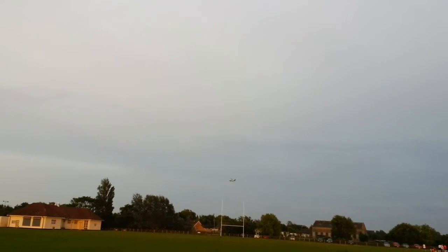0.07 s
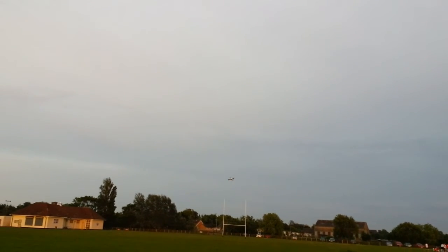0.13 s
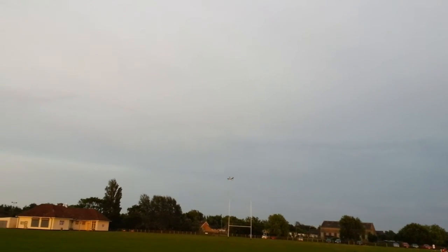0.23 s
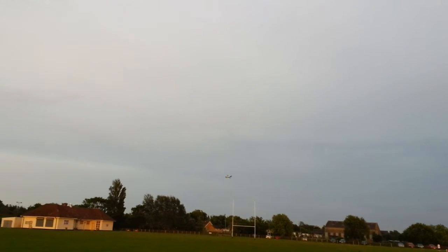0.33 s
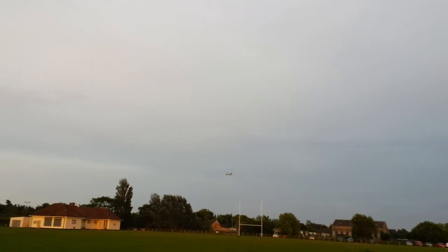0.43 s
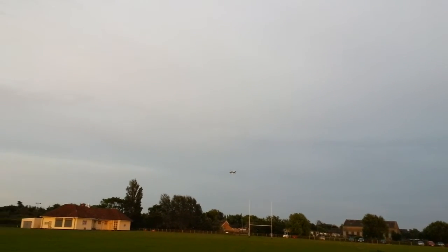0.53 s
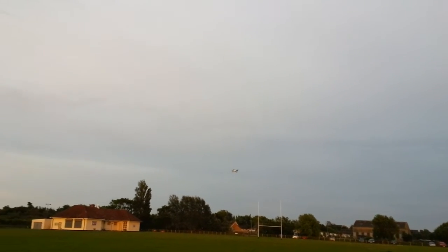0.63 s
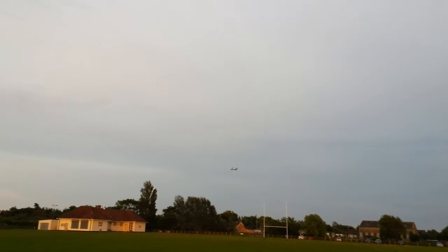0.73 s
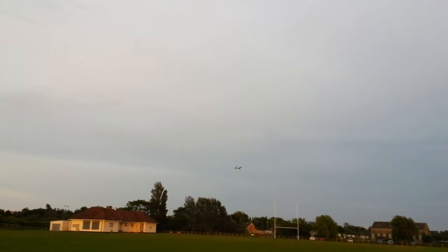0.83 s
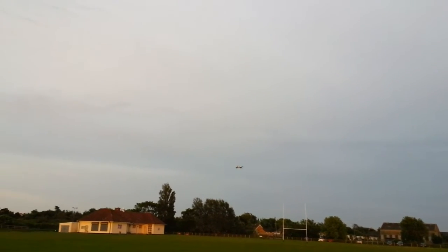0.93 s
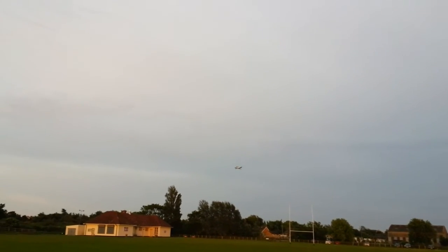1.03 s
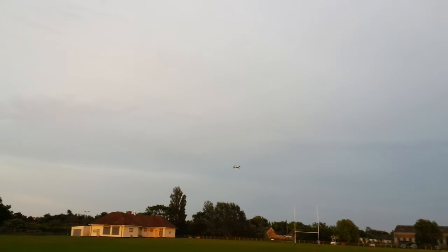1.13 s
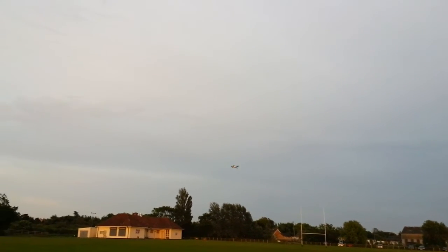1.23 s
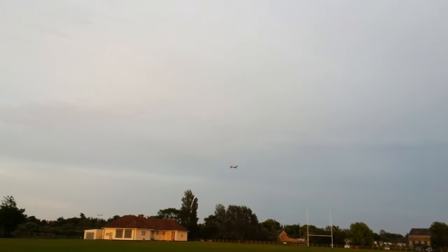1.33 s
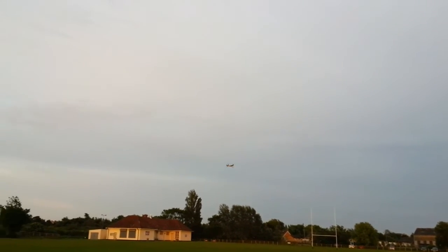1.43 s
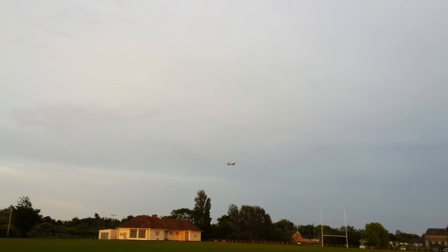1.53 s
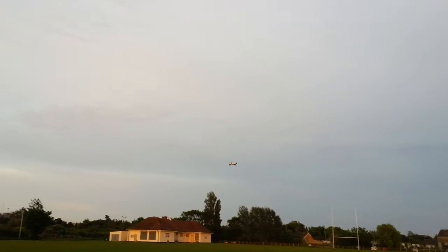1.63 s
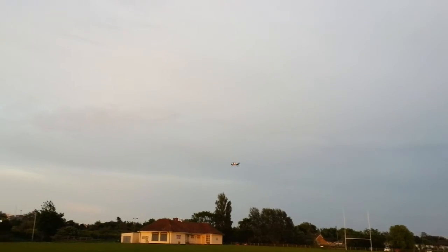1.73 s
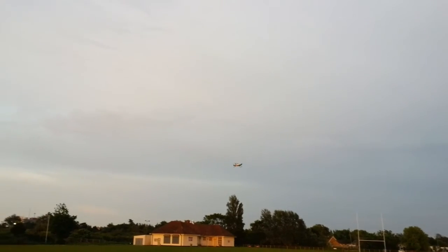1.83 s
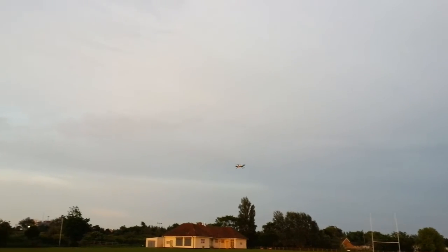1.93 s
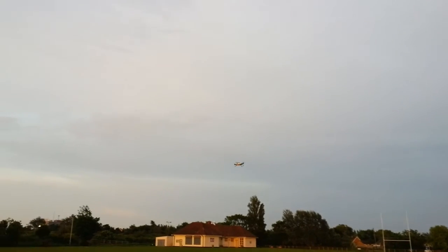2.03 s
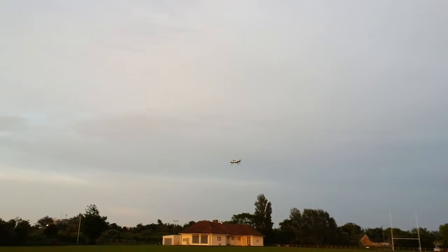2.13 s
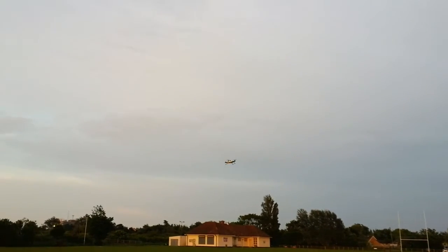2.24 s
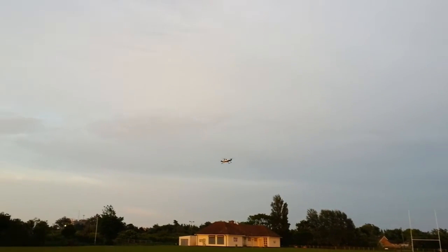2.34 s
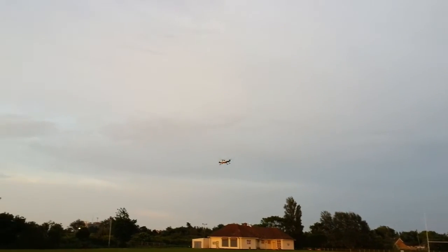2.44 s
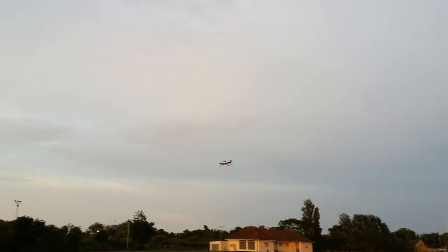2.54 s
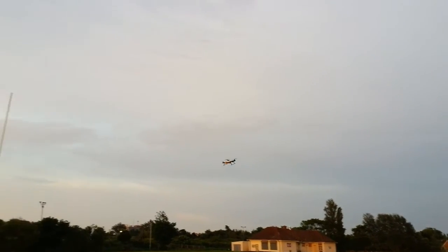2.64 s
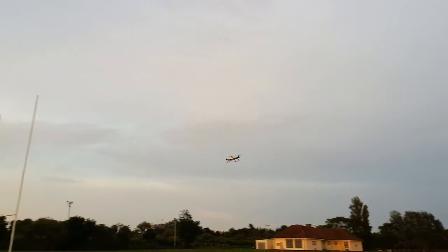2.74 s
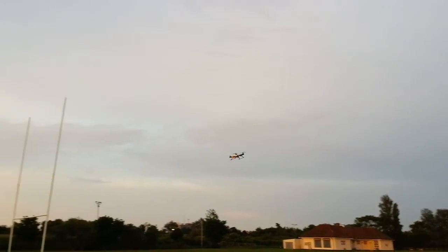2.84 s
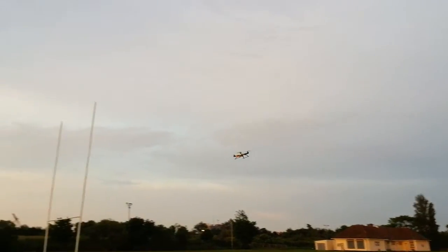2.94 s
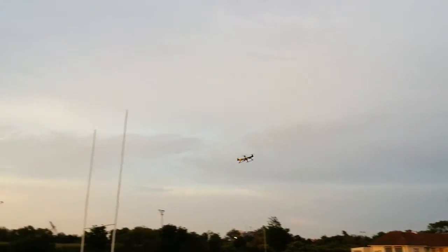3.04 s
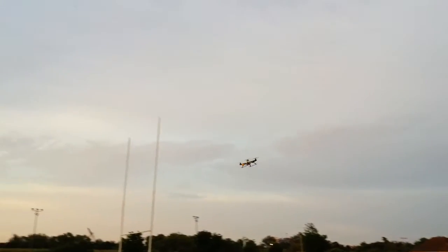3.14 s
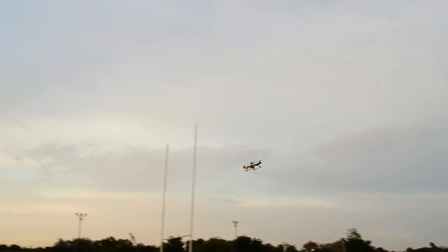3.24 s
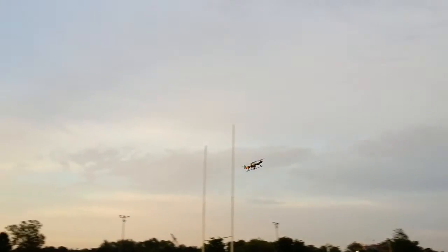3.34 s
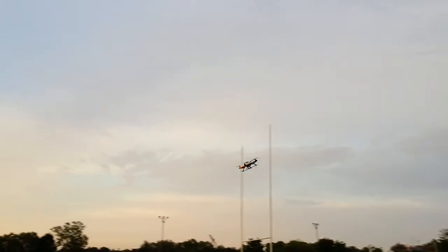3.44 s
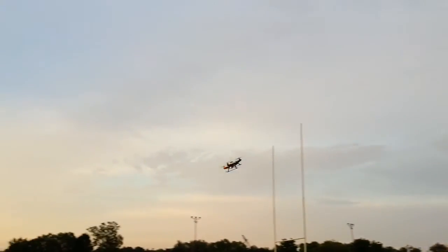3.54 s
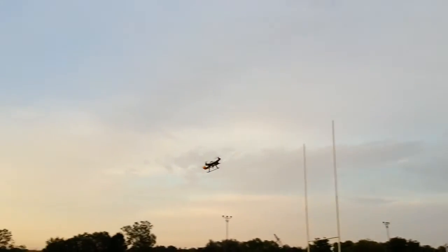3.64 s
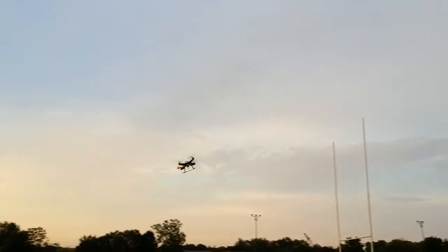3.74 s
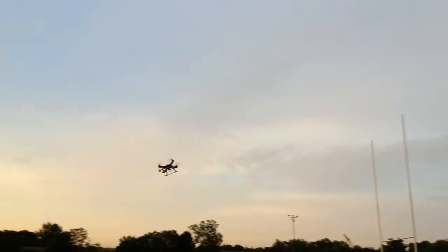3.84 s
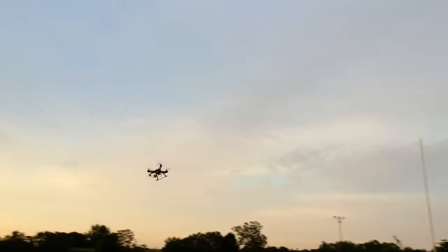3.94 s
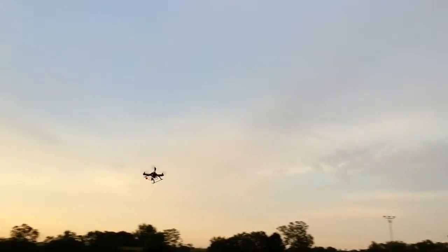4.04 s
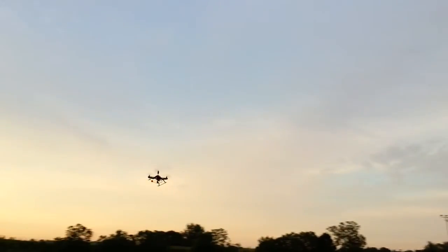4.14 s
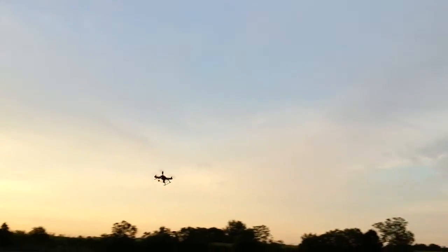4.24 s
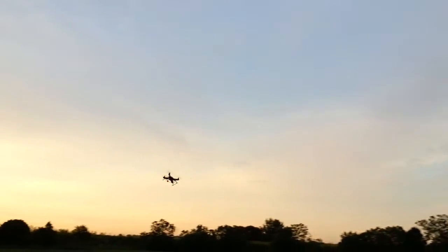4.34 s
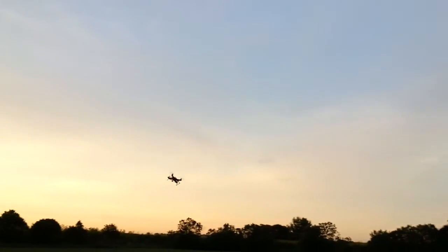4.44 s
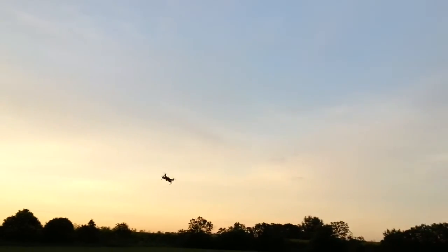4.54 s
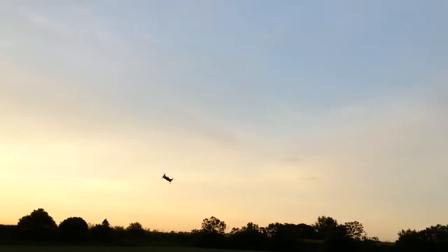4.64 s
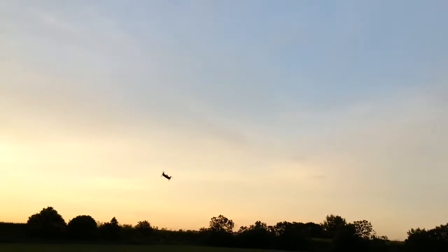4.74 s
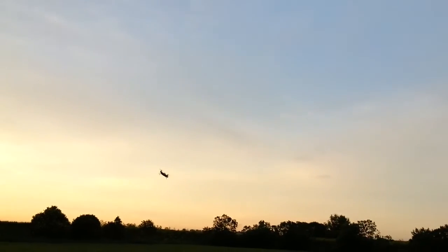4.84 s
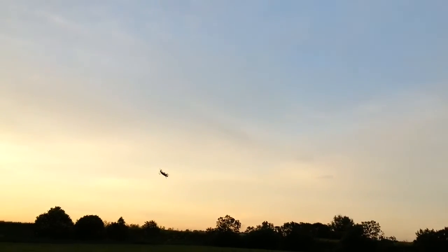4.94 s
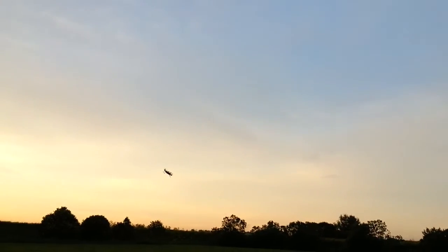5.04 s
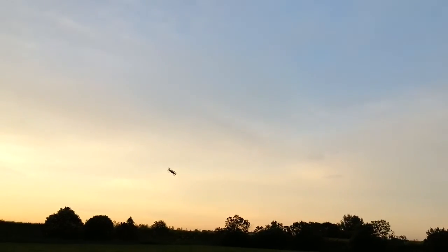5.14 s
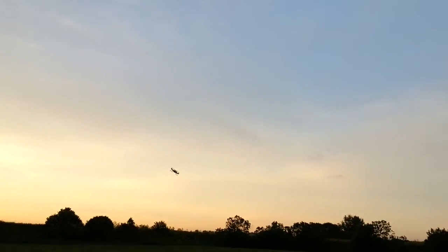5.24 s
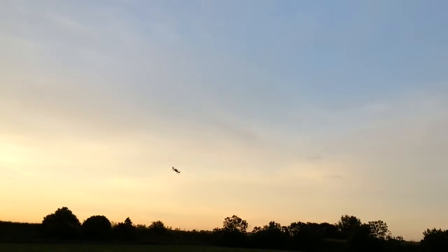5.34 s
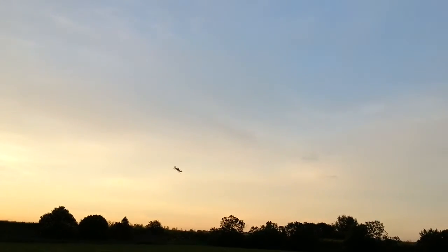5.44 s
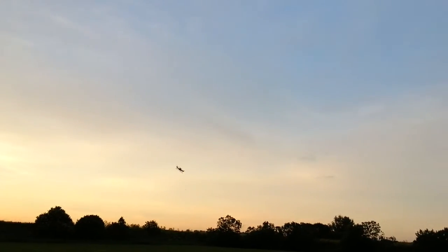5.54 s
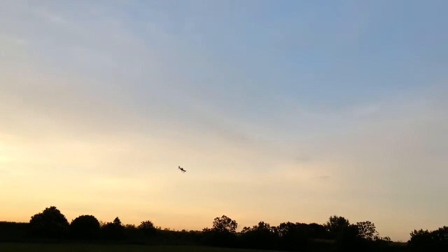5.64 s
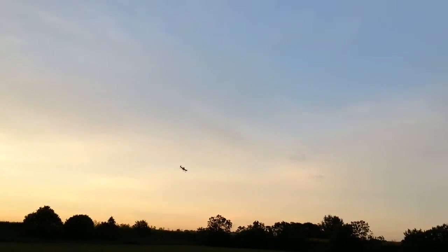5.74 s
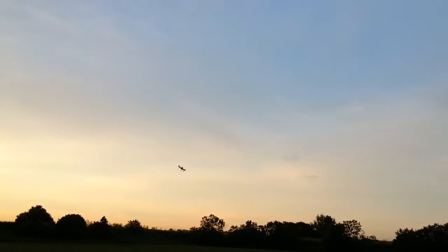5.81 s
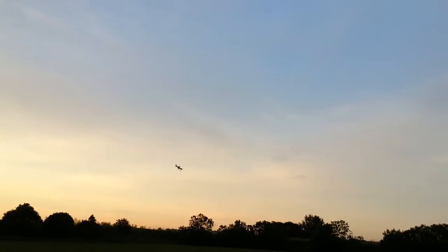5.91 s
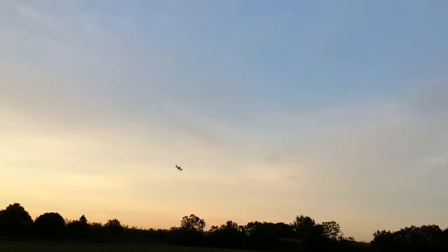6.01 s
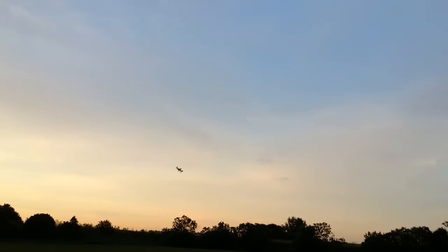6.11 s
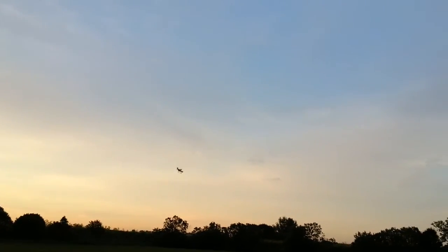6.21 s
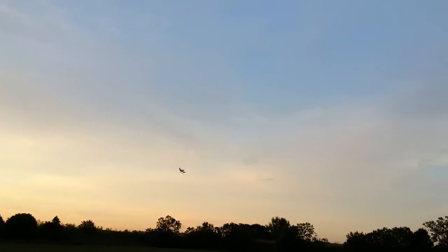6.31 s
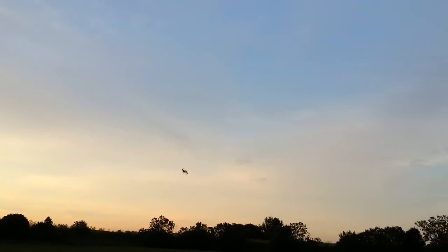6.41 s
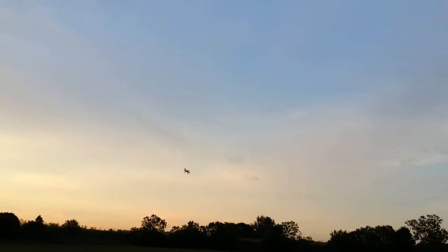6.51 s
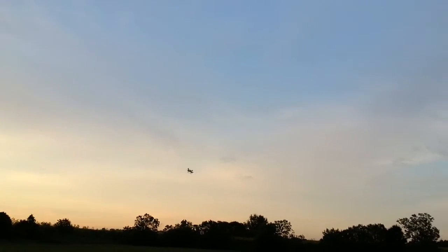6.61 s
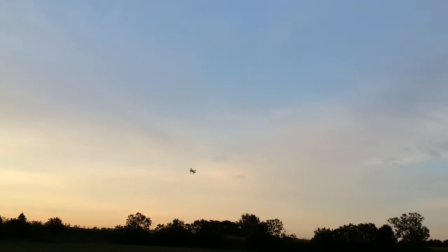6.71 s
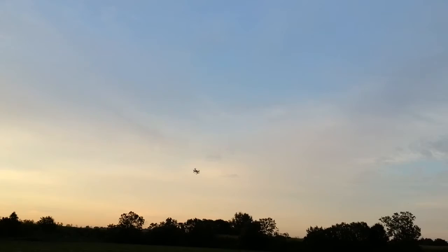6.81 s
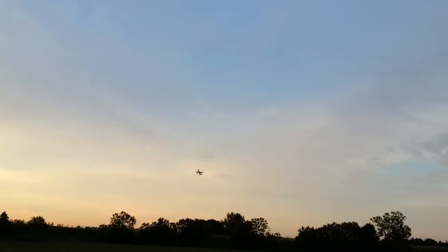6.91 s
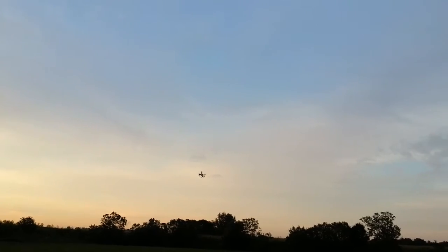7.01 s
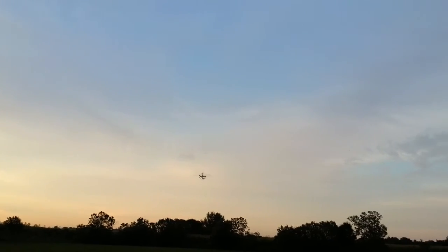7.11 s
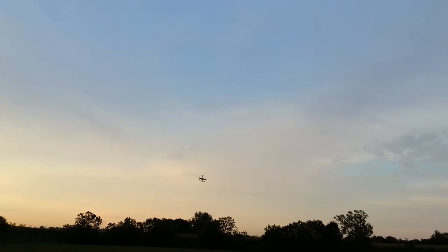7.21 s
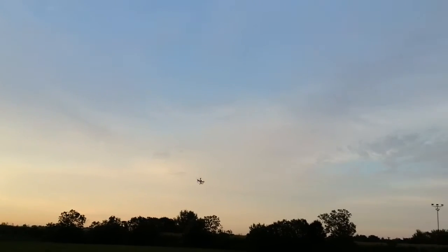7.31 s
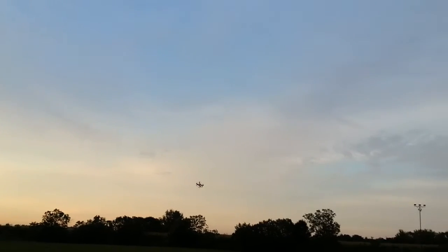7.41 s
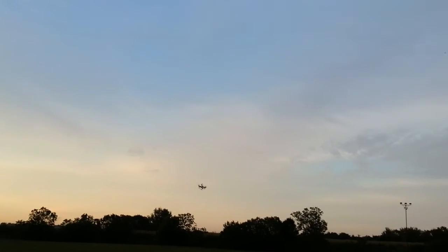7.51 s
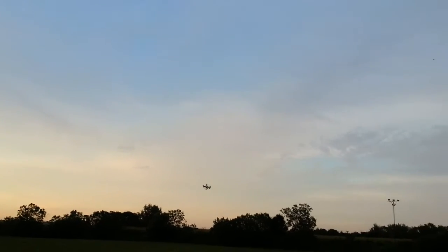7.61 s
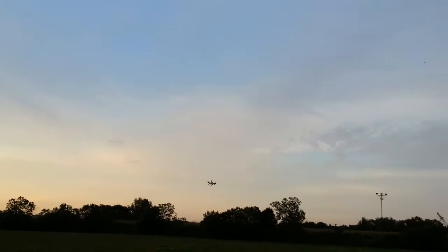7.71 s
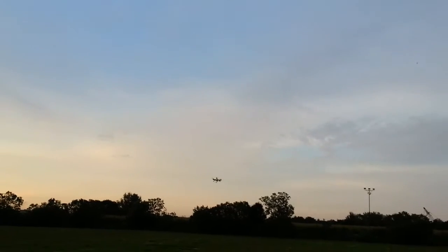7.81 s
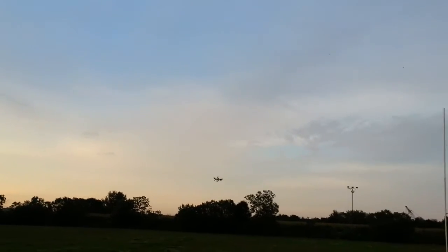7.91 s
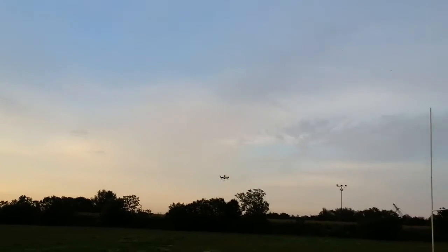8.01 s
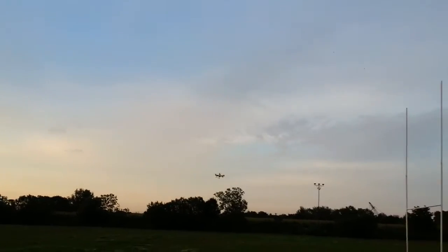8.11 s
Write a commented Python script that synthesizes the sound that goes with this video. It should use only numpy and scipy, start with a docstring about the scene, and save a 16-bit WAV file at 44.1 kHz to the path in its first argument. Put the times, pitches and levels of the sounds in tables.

```python
"""Drone fly-past over grass

A small multi-rotor drone comes close over a grass field, flies off and turns back.
Its motors whine at their magnet rates; speed controllers whistle and mix with the whine.
The blades hiss directly and off the grass, with low hums; all reaches a pair of microphone ports that
turn to follow it. A distant road roars off to one side and a faint breeze rumbles on the ports."""
import sys
import numpy as np
from scipy import signal
from scipy.fft import rfft, irfft
from scipy.io import wavfile
from scipy.ndimage import uniform_filter1d, map_coordinates

SR = 44100
rng = np.random.default_rng(int(sys.argv[2]) if len(sys.argv) > 2 else 0)


def master(y):
    """Save y as 16-bit WAV."""
    cut = np.clip(np.atleast_2d(y).T, -1, 1)
    pcm = np.round(cut * 32767)  # scale
    wavfile.write(sys.argv[1], SR, pcm.astype(np.int16))


N = 359856

# course of the drone: [t/s, approach speed/(m/s), controller whistle level at 1 m/dB]
COURSE = [(0.0, 5.5, -40), (0.15, 5.0, -37), (1, 5.8, -33), (1.35, 6.1, -32), (1.6, 6.3, -36),
          (2.2, 6.8, -39), (2.55, 6.24, -39), (2.76, 5.9, -34), (2.93, 5.5, -30), (3.05, 5.2, -38),
          (3.28, 2.8, -40), (3.45, 0.76, -34), (3.72, -2.24, -43), (3.85, -3.9, -43), (3.96, -5.1, -36),
          (4.1, -5.9, -32), (4.37, -6.6, -30), (4.5, -6.5, -37), (4.69, -6.4, -37), (5.15, -4.9, -36),
          (5.4, -4.8, -34), (5.95, -1.7, -36), (6.5, 0.5, -31), (7.13, 4.2, -36), (7.37, 5.5, -36),
          (7.7, 5.8, -39), (7.82, 5.9, -46), (7.98, 5.9, -37), (8.11, 5.9, -39)]
# resonances of the two microphone ports: [f/Hz, left gain/dB, right gain/dB]
PORT_COLOUR = [(1520, 0.5, 1), (2240, 1, -0.5), (2610, 2.5, 0), (3200, 10, 10), (3750, 9.5, 10),
               (4030, 3.5, -6), (4730, 4, 6.5), (5330, 2.5, -0.5), (5600, -2, -3), (5950, -4.5, -11.5),
               (6440, -2.5, -2.5), (6640, 3.5, 1.5), (7600, 1, -1), (8100, 6, -3), (8750, 2.5, -7),
               (9400, -1, 2), (10410, 0, -4.5), (10840, -4.5, -16.5), (11920, -2, 0), (14100, 3.5, -1),
               (14600, -10.5, -5.5)]


def undb(db):
    """Amplitude factor of a level in dB."""
    return 10 ** (np.asarray(db) / 20)


def unit(x):
    """Scale to an RMS of 1."""
    return x / np.sqrt(np.mean(x ** 2))


def curves(table):
    """Columns of a table, joined by straight lines in time."""
    s, *columns = np.transpose(table)
    t = np.arange(N) / SR
    return [np.interp(t, s, column) for column in columns]


def colour(x, hz, db):
    """Causal filter through (Hz, dB) points, from the cepstrum of the log gain."""
    f = np.fft.rfftfreq(4096, 1 / SR)
    gain_db = np.interp(np.log(f + 1), np.log(hz), db)
    cepstrum = irfft(np.log(undb(gain_db)))
    # folding the cepstrum forward in time gives minimum phase
    cepstrum[1:2048] *= 2
    cepstrum[2049:] = 0
    impulse = irfft(np.exp(rfft(cepstrum)))
    return signal.fftconvolve(x, impulse)[:N]


def delay(x, seconds):
    """Read x at a moving lag; a negative lag reads ahead."""
    return map_coordinates(x, [np.arange(N) - seconds * SR], order=3, mode="reflect")


def walk(rate):
    """Random levels held for 1 / rate s and smoothed twice; spread near 1."""
    k = int(SR / rate)
    steps = np.repeat(rng.standard_normal(N // k + 1), k)
    return 1.193 * uniform_filter1d(uniform_filter1d(steps, k), k)[:N]


def turns(hz):
    """Running phase in radians of a moving frequency, from a random start."""
    return 2 * np.pi * (np.cumsum(hz) / SR + rng.random())


def swell(start, end, edge):
    """1 between start and end, 0 outside, with straight ramps of edge s centred on both."""
    t = np.arange(N) / SR
    return np.clip(np.minimum(t - start, end - t) / edge + .5, 0, 1)


def breeze():
    """Faint, unsteady low rumble on each port."""
    waver_db = np.minimum(4.9 * walk(7) + 7.2 * walk(14), 4.0)  # level wavers at random, rises capped
    shared = rng.standard_normal(N)
    ports = []
    for _ in range(2):
        noise = 0.52 * shared + rng.standard_normal(N)
        rumble = colour(noise, [20, 50, 120, 220, 400], [-6, -13.5, -11.5, -5.5, -22.0])
        ports.append(undb(-70.5 + waver_db + 2.8 * walk(9)) * unit(rumble))
    return np.array(ports)


def road():
    """Tyre roar: noise from one bearing, set by the lag between the ports, with a diffuse share."""
    # spectrum of the roar: [f/Hz, relative density/dB]
    roar_shape = [(130, -59.5), (220, -29), (306, -18.5), (350, -25), (593, -7), (768, -4.5), (995, 0),
                  (1770, -10), (2010, -13.5), (2600, -24.5), (3380, -47), (5720, -120)]
    # road swinging round as the ports turn: [t/s, level before a 4 dB lift/dB, left port lead/us,
    # diffuse share relative to the direct roar/dB]
    traffic = [(0, -46, 167, -5), (1.4, -47, 217, -8), (2.6, -45.5, 313, -3.5), (3.1, -47, 400, 1),
               (4.4, -47, 294, -6.5), (6, -47.5, 307, -3), (7.1, -47, 344, -0.5), (8.16, -45.5, 410, 3)]
    db, lead_us, diffuse_db = curves(traffic)
    hz, shape_db = np.transpose(roar_shape)
    roar, left, right = (unit(colour(rng.standard_normal(N), hz, shape_db)) for _ in range(3))
    ports = np.array([delay(roar, -lead_us / 2e6) + undb(diffuse_db) * left,
                      delay(roar, lead_us / 2e6) + undb(diffuse_db) * right])
    level = undb(db + 4.0 + 0.7 * walk(12) + 1.0 * walk(40))
    return level * ports / np.sqrt(1 + undb(2 * diffuse_db))  # the share leaves the power alone


def course():
    """Doppler factor and distance loss (dB), both from the approach speed."""
    nearest_m, nearest_s, sound_m_s = 4.5, 3.52, 343
    speed = curves(COURSE)[0]
    flown = np.cumsum(speed) / SR
    distance = nearest_m + flown[int(nearest_s * SR)] - flown
    return 1 + speed / sound_m_s, -20 * np.log10(distance)


def hum():
    """Wavering low tones of the blades, each a sine gliding between two pitches."""
    # low rotor tones: [start/s, end/s, start f/Hz, end f/Hz, RMS level before the ports/dB]
    hum_tones = [(2.3, 3.05, 482, 488, -63), (2.6, 3.15, 270, 255, -71), (3.38, 3.7, 448, 455, -60),
                 (3.7, 4.22, 455, 466, -59), (3.55, 3.92, 500, 540, -55), (3.33, 3.45, 590, 605, -59),
                 (3.48, 3.63, 605, 632, -55), (3.47, 3.57, 660, 665, -57), (3.95, 4.32, 622, 640, -55),
                 (4.15, 4.55, 535, 570, -58), (4.25, 4.5, 303, 312, -65), (3.9, 4.2, 345, 352, -65),
                 (5.1, 5.3, 300, 305, -70), (7.65, 8.0, 372, 362, -67), (3.6, 3.9, 960, 1030, -62)]
    t = np.arange(N) / SR
    out = 0
    for start, end, hz0, hz1, db in hum_tones:
        hz = np.interp(t, [start, end], [hz0, hz1]) + 3 * walk(25)
        level = np.sqrt(2) * swell(start, end, .08) * undb(db + 1.8 * walk(20))
        out = out + level * np.sin(turns(hz))
    return out


def flecks():
    """Level (dB) of brief spits where a blade cuts a swirl, over a quick random sputter."""
    # spits of the hiss: [t/s, rise (negative: dip) over the sputter/dB]
    swirl_cuts = [(1.537, 5), (2.042, 4), (2.186, 0), (2.42, 7), (2.491, 3), (2.528, 7), (2.609, 8),
                  (3.472, 3), (3.63, 1), (3.732, 7), (3.785, 2), (3.913, -2), (6.542, 4), (7.262, 10.5),
                  (7.523, 3), (7.646, 8.5), (7.82, 9), (7.925, 1), (7.978, 6)]
    fleck_s, sputter_db = 0.0026, 1.01  # half length of a fleck, spread of the sputter
    t = np.arange(N) / SR
    db = sputter_db * walk(90)
    for s, rise_db in swirl_cuts:
        near = slice(int((s - .03) * SR), int((s + .03) * SR))
        db[near] += rise_db * np.exp(-((t[near] - s) / fleck_s) ** 2)
    return db


def blades(wavers):
    """Turbulent hiss: four noise bands that fade with distance and waver at random."""
    # hiss as the blades turn towards the ports: [t/s, level at 1 m before a 1.5 dB cut/dB, then relative
    # to it: treble before a 3 dB lift/dB, blade tips before a 4 dB lift/dB, low whoosh/dB]
    blade_hiss = [(0, -26, -10, -17, -5.5), (1, -28, -8, -15, -1), (1.7, -27, -8.5, -17, -3.5),
                  (2.1, -24.5, -9, -20, -8.5), (2.6, -25, -8, -23, -6), (3, -25, -10.5, -21, -10),
                  (3.3, -26.5, -8, -16, -6.5), (3.45, -26, -11, -17, -5.5), (3.57, -22.5, -14.5, -20, -8),
                  (3.7, -22.5, -16, -20, -7.5), (3.9, -24, -14, -18, -3.5), (4.15, -24.5, -12.5, -19, -4),
                  (4.35, -25.5, -14.5, -19, -4.5), (4.55, -24, -16, -19.5, -8.5),
                  (5.3, -27, -13.5, -21, -9), (6.2, -28.5, -10.5, -16, -4), (6.9, -27, -8, -20, -5),
                  (7.2, -26, -9.5, -18, -4.5), (7.5, -23.5, -11.5, -23, -6), (7.7, -24.5, -10.5, -24, -5),
                  (7.93, -24.5, -12.5, -23, -8), (8.05, -24.5, -12.5, -23, -8), (8.16, -26, -13, -23, -10)]
    # gain of the mid band above 4 kHz, stronger on the approach than after the pass: [t/s, gain/dB]
    brightness = [(0, 0.5), (1.5, 1), (2.1, 1), (2.7, 3.5), (3.2, 0.5), (3.65, -2), (4.3, -2), (4.8, 0),
                  (8.16, -1.5)]
    level_db, treble_db, tip_db, whoosh_db = curves(blade_hiss)
    slow, brisk, quick, tip_waver, spit = wavers
    low = colour(rng.standard_normal(N), [120, 300, 500, 1400, 2600, 5000],
                 [-88.5, -13.0, -4.0, -1.5, -4, -37.5])
    mid = colour(rng.standard_normal(N), [200, 1000, 2200, 5500, 7500, 9000, 11000],
                 [-87, -16.5, -6.5, 1.5, 0.5, -7.5, -38.0])
    below = signal.sosfiltfilt(signal.butter(4, 4050, fs=SR, output="sos"), mid)
    mid = below + undb(curves(brightness)[0]) * (mid - below)
    treble = colour(rng.standard_normal(N), [2000, 6860, 9300, 11140, 13400],
                    [-92, -19, -1.5, -0.5, -25.5])
    tips = colour(rng.standard_normal(N), [3000, 10000, 11600, 14500], [-84, -36, 1.0, -6.0])
    hiss = undb(whoosh_db + 0.91 * brisk) * unit(low)
    hiss += undb(0.93 * slow + 0.47 * brisk + spit) * unit(mid)
    hiss += undb(treble_db + 3.0 + 0.74 * slow + 0.69 * quick + .6 * spit) * unit(treble)
    hiss += undb(tip_db + 4.0 + .9 * slow + 1.2 * tip_waver + .6 * spit) * unit(tips)
    return undb(level_db + course()[1] - 1.5) * hiss


def whines(doppler):
    """Magnet tones with shaft sidebands; also the summed shaft wobble and each tone's phase."""
    # a table for each whine that stands out: [t/s, shaft rate/(turns/s), level at 1 m behind the ports/dB]
    motor_runs = [
        [(0.0, 163.25, -26), (0.2, 163.99, -23), (0.57, 166.92, -27), (0.86, 167.39, -28), (1.35, 166.39, -27),
         (1.54, 167.04, -28), (2.02, 165.01, -23), (2.52, 164.71, -25), (2.84, 164.89, -25),
         (2.93, 164.95, -28), (2.99, 164.0, -26), (3.04, 163.8, -25), (3.17, 164, -23), (3.44, 163.5, -22),
         (3.6, 162.5, -22.5), (3.8, 160.7, -23), (4.08, 160.83, -22), (4.46, 158.8, -24), (4.59, 161.1, -24),
         (4.73, 160.9, -21), (4.9, 161.4, -22), (5.19, 162.86, -27), (5.42, 162.14, -27), (6.0, 162.79, -28),
         (6.3, 163.18, -23), (6.69, 163.16, -23), (7.0, 164.8, -28), (7.17, 167.06, -29), (7.34, 167.3, -31),
         (7.46, 165.2, -38), (7.59, 166.0, -32), (7.71, 164.3, -33), (7.84, 166.4, -32), (7.94, 164.9, -32),
         (8.04, 163.3, -29), (8.15, 164.5, -29)],
        [(0.0, 167.19, -31), (0.23, 167.12, -27), (0.56, 170.26, -29), (1.41, 171.5, -26), (1.78, 171.47, -31),
         (2.93, 169.6, -32), (3.13, 171.02, -33), (3.43, 171.53, -32), (3.8, 169.15, -30), (4.07, 169.2, -28),
         (4.44, 167.98, -28), (4.62, 169.55, -30), (5.2, 170.81, -33), (5.87, 170.65, -30), (6.34, 169.73, -31),
         (6.88, 170.41, -36), (6.94, 169.8, -35), (7.05, 163.0, -25), (7.11, 161.6, -22), (7.23, 161.13, -20),
         (7.35, 159.34, -19), (7.49, 159.95, -20), (7.6, 159.52, -21), (7.73, 160.7, -19), (7.82, 160.25, -21),
         (7.95, 161.4, -22), (8.05, 161.5, -25), (8.15, 162.4, -25)],
        [(0.57, 167.2, -36), (0.86, 167.65, -34), (1.35, 166.7, -38), (1.54, 167.3, -39), (2.02, 165.3, -33),
         (2.52, 164.98, -33), (2.9, 164.65, -31), (3.31, 167.02, -30), (3.6, 165.36, -29), (4.16, 164.88, -31),
         (4.41, 164.87, -34), (4.56, 165.9, -30), (5.0, 165.46, -27), (5.41, 166.05, -33), (5.76, 166.06, -29),
         (5.91, 165.28, -35), (6.61, 166.09, -29), (6.86, 164.91, -32), (6.97, 165.31, -31),
         (7.14, 161.62, -25), (7.24, 162.33, -25), (7.55, 161.35, -26), (7.72, 162.0, -24), (7.81, 161.3, -27),
         (7.95, 164.6, -32), (8.05, 165.7, -35), (8.15, 166.2, -36)],
        [(0.3, 167.96, -45), (0.55, 170.54, -36), (0.75, 171.85, -35), (1.05, 172.96, -36), (1.36, 171.29, -31),
         (1.58, 171.88, -31), (1.9, 170.55, -32), (2.1, 169.72, -33), (2.55, 169.54, -34), (2.9, 169.51, -36),
         (3.3, 171.05, -40), (3.75, 172.1, -44), (4.09, 172.4, -37), (4.45, 174.71, -44), (4.67, 172.81, -33),
         (5.38, 170.45, -34), (6.05, 170.23, -36), (6.89, 172.1, -41), (7.0, 171.3, -50), (7.1, 169.9, -33),
         (7.22, 169.8, -28), (7.39, 168.27, -25), (7.6, 168.51, -24), (7.82, 169.15, -27), (8.03, 169.8, -32),
         (8.11, 169.42, -34)],
        [(5.6, 166.05, -32), (5.8, 166.0, -31), (5.88, 166.4, -32), (5.96, 166.4, -33), (6.03, 166.21, -34),
         (6.12, 166.55, -34), (6.27, 166.44, -35), (6.4, 166.91, -35), (6.55, 167.0, -32), (6.7, 166.79, -33),
         (6.9, 166.1, -36)],
        [(2.28, 154.96, -39), (2.42, 155.76, -33), (2.68, 153.84, -34), (2.82, 155.14, -33), (2.9, 154.64, -41)],
    ]
    # for each whine: [level of sidebands one shaft turn away/dB]
    shaft_sidebands = [-22.5, -24, -27, -22, -28, -30]
    magnet_order = 42  # whine cycles per shaft turn
    port_hz, *port_db = np.transpose(PORT_COLOUR)
    out, wobble, phases = 0, 0, []
    for table, side_db in zip(motor_runs, shaft_sidebands):
        shaft_hz, db = curves(table)
        hz = magnet_order * shaft_hz * doppler
        phase = turns(hz + 5.0 * walk(45) + 2.0 * walk(9))  # jitter and wander in Hz
        phases.append(phase)
        shaft = np.cos(phase / magnet_order)
        gate = swell(table[0][0], table[-1][0] + .05, 0.05)
        # take off the mean port gain that comes later
        dry_db = db - np.interp(hz, port_hz, np.mean(port_db, axis=0))
        # uneven air load spreads a noisy skirt round the tone
        load = 1 + 2 * undb(side_db) * shaft + undb(-13) * walk(300)
        out = out + gate * undb(dry_db + 1.5 * walk(15)) * load * np.sin(phase)
        wobble = wobble + gate * shaft
    return out, wobble, phases


def mixing_tones(whistle_phase, whine_phases):
    """Sum and difference tones where whistle and whine mix, roughened by quick noise."""
    # mixed tones: [whine index, times whistle, times whine, start/s, end/s, level at 1 m/dB]
    mixed = [(0, 2, -1, 0, 1.8, -41), (0, 2, -1, 1.8, 2.9, -39), (0, 2, -1, 4.6, 6.9, -45),
             (0, -2, 3, .15, 1.9, -42), (0, -2, 3, 2.43, 3.08, -33), (2, -2, 3, 2.05, 2.4, -40),
             (1, 2, -1, 0, .5, -40), (1, 2, -1, 3, 3.6, -43), (1, 2, -1, 7.05, 8.16, -47),
             (2, 2, -1, 4.4, 6.8, -46), (2, 3, -3, 5.2, 5.55, -48), (3, -1, 2, .55, 1.85, -36),
             (3, 2, -1, .5, 2.7, -42), (3, 2, -1, 7.4, 8.16, -41), (4, -2, 3, 5.7, 6.4, -46),
             (4, 3, -3, 5.65, 6.58, -41), (4, 3, -3, 6.58, 6.9, -46)]
    out = 0
    for motor, times_whistle, times_whine, start, end, db in mixed:
        level = swell(start, end, .2) * undb(db + 1.1 * walk(20))
        phase = times_whistle * whistle_phase + times_whine * whine_phases[motor]
        out = out + level * (1 + .45 * walk(200)) * np.sin(phase)
    return out


def whistle(phase, wobble):
    """Speed controllers switching slightly apart; each shaft turn loads them, giving sidebands."""
    # four controllers, one stands out: [offset f/Hz, relative level/dB]
    controllers = [(-19, -11), (0, 0), (9, -9), (26, -12)]
    # the offset and its walk, both in Hz, turn as a phase added to the common one
    clocks = sum(undb(db) * np.sin(phase + turns(hz + 8 * walk(12))) for hz, db in controllers)
    return undb(curves(COURSE)[1] + 1.0 * walk(14)) * (1 + 0.33 * wobble) * clocks


def motors():
    """Whine, whistle and their mixed tones, Doppler-shifted and fading with distance."""
    doppler, far_db = course()
    whistle_phase = turns(8030 * doppler)  # Hz at rest
    whine, wobble, whine_phases = whines(doppler)
    tones = whine + mixing_tones(whistle_phase, whine_phases) + whistle(whistle_phase, wobble)
    return np.sqrt(2) * undb(far_db) * tones  # levels are RMS


def drone():
    """Direct sound and ground echo reach the ports with a lag that follows the bearing."""
    # geometry: [t/s, ground echo delay/ms, left port lead/us]
    bearing = [(0, 1.8, 21), (.5, 2.13, 35), (1.5, 3.8, 32), (2.2, 3.35, 28.5), (3, 3.9, 61),
               (3.25, 5.16, 42), (3.5, 4.46, -29), (3.75, 4.16, -51), (4, 3.52, -32), (4.5, 2.9, -40.5),
               (6, 2.096, -39), (6.75, 2.03, -12), (7.25, 1.97, -16), (7.75, 2.26, -2), (8.16, 2.2, -14)]
    # share of the hiss that reaches each port by its own way: [f/Hz, gain/dB]
    scattered = [(300, -3), (2000, -6.5), (5000, -8), (9000, 0.5), (12000, 5), (14500, 4.5)]
    echo_ms, lead_us = curves(bearing)
    wavers = [walk(4.9), walk(12), walk(16), walk(8.8), flecks()]
    hiss = blades(wavers)
    # the grass sends back mostly low hiss and none of the whine
    grass = colour(hiss, [1215, 4860], [-5, -11])
    both = motors() + hum() + hiss + delay(grass, echo_ms / 1000)
    left, right = (colour(blades(wavers), *np.transpose(scattered)) for _ in range(2))
    return np.array([delay(both, -lead_us / 2e6) + left, delay(both, lead_us / 2e6) + right])


def scene():
    """Breeze, road and drone at the two ports."""
    return breeze() + road() + drone()


def record(dry):
    """Each port colours the sound with its resonances; a steep low-pass cuts the top."""
    hz, *port_db = np.transpose(PORT_COLOUR)
    wet = np.array([colour(x, hz, db) for x, db in zip(dry, port_db)])
    return signal.sosfilt(signal.ellip(10, .2, 70, 14600, fs=SR, output="sos"), wet)


dry = scene()
out = record(dry)
master(out)
```